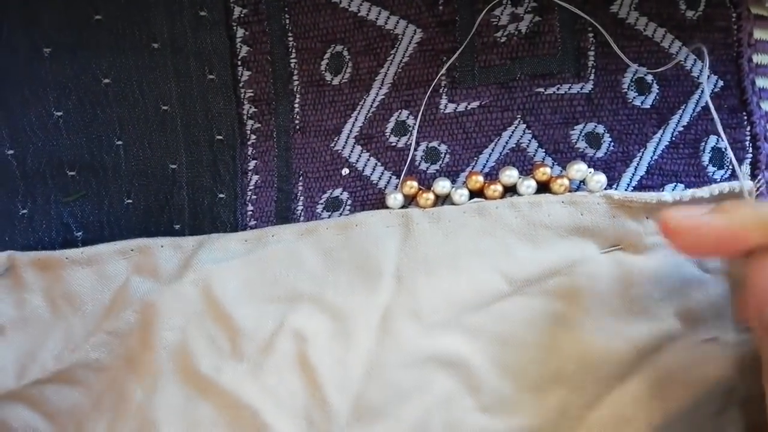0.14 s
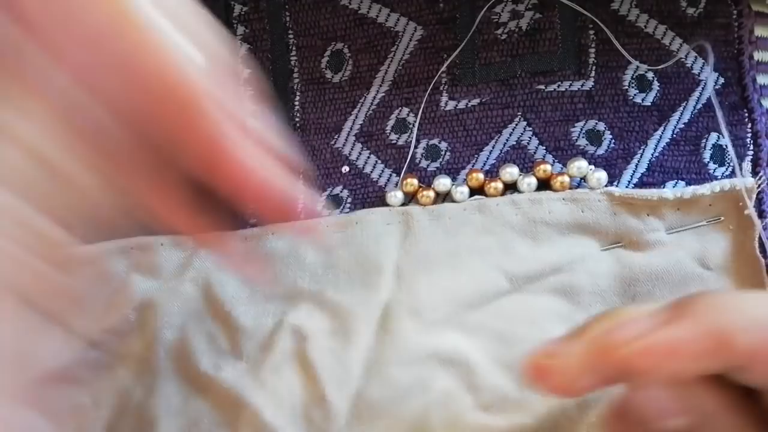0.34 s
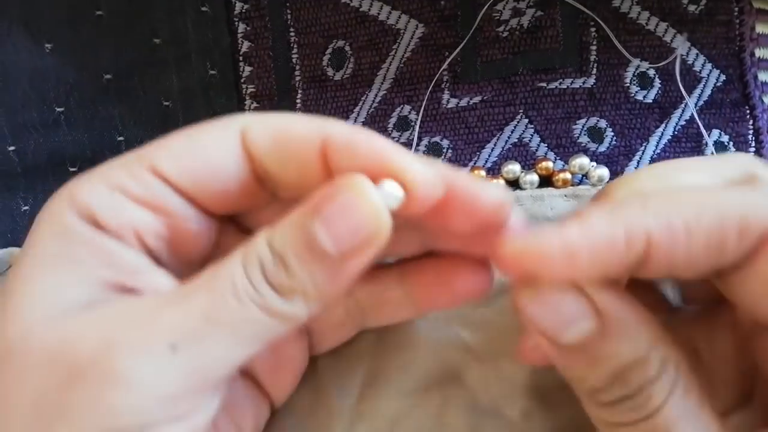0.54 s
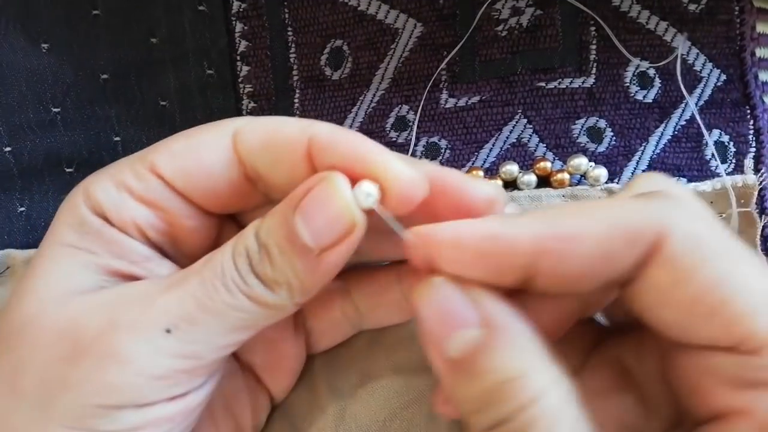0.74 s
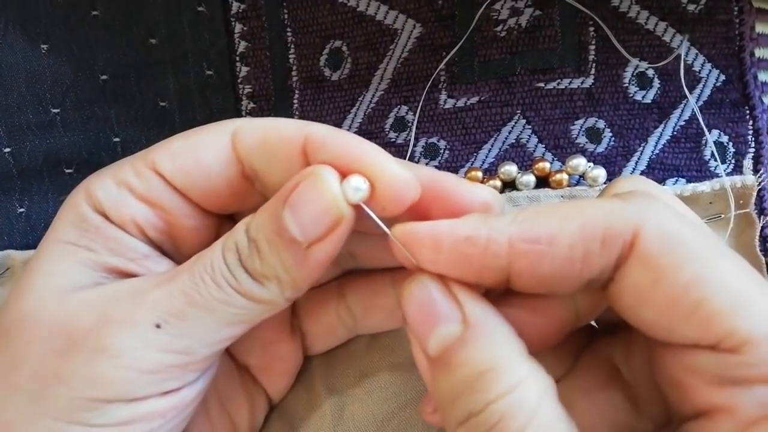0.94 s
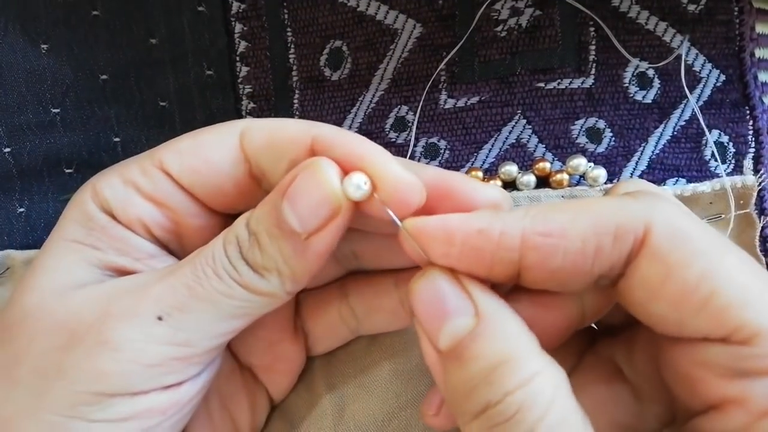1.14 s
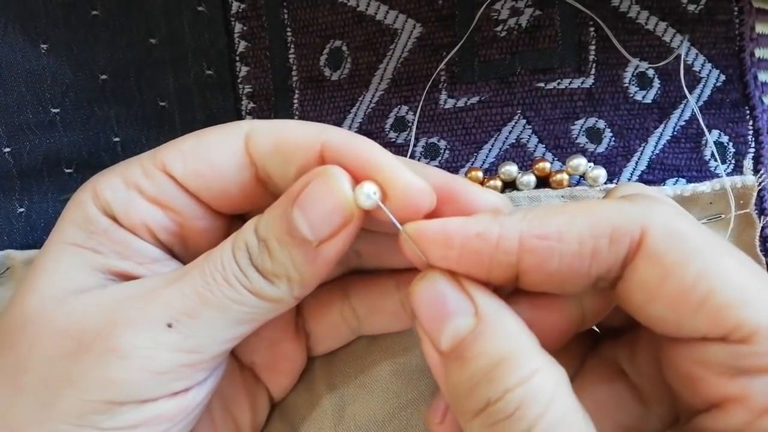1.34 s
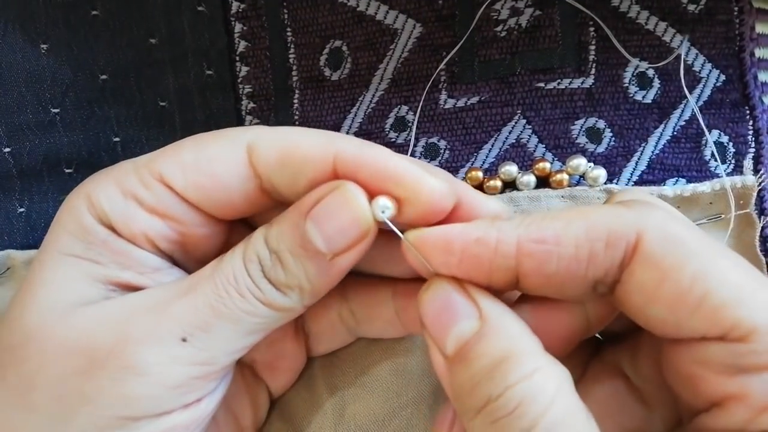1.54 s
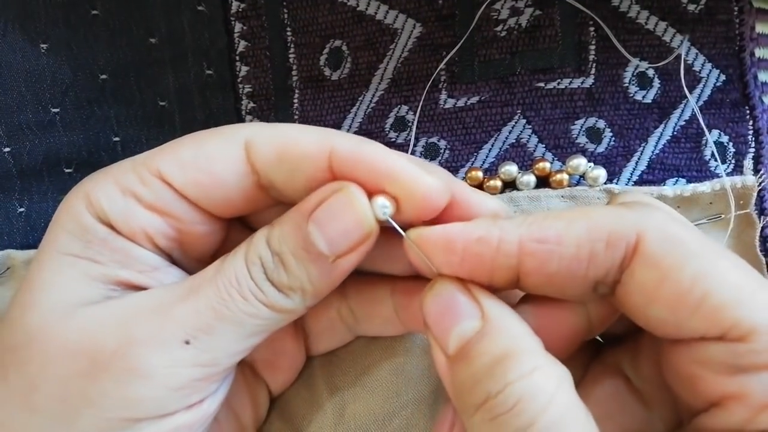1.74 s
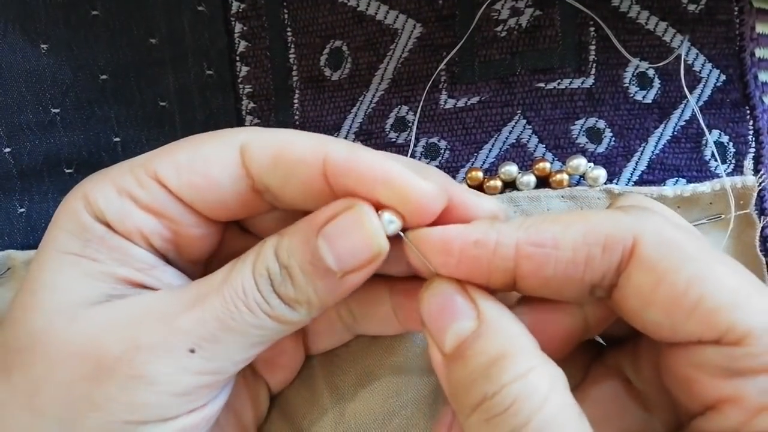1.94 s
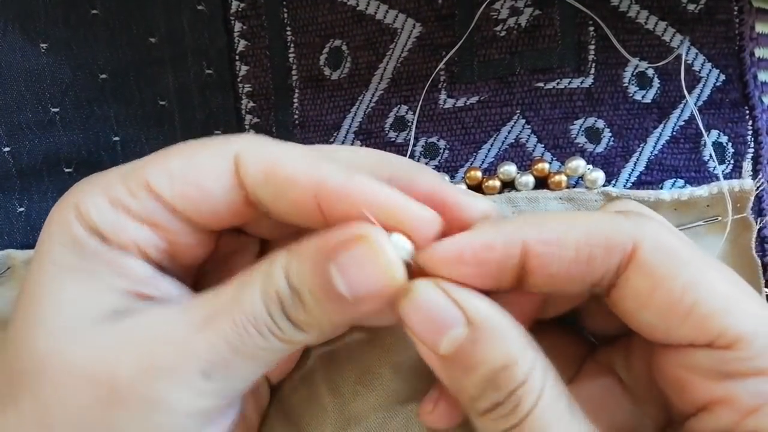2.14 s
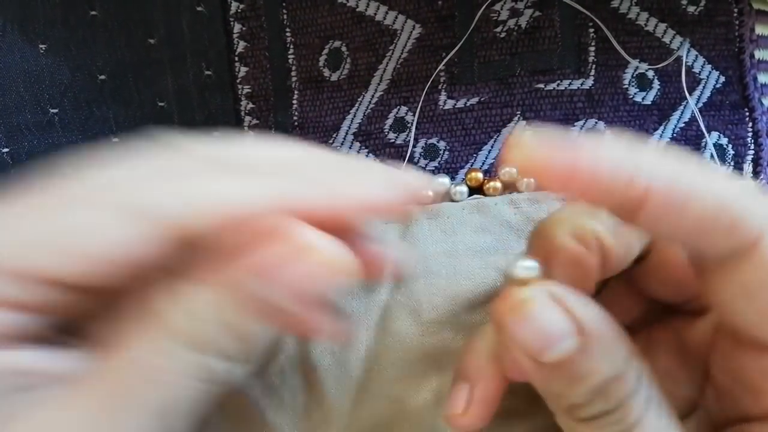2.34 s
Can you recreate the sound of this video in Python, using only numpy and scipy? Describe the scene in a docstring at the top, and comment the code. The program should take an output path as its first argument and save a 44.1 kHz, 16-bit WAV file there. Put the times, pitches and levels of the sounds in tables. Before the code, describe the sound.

A small bead hits a hard little dish, left of centre, at about 0.07 s, chattering in rapid, very bright, short clicks until 0.16 s. Weaker ticks come around 0.23-0.29 s and a faint nudge and roll at 0.39-0.45 s. Light cloth brushing and soft low table bumps surround it. Then quiet hiss and rumble, a barely audible tick near 1.87 s, and a soft sleeve stroke peaking around 2.29 s.

```python
"""In a quiet room, a bead drops into a small hard dish on the left, bounces rapidly and is nudged again.
Each contact is a filtered noise tap plus decaying dish modes; rolling is a shower of tiny contacts.
Shaped, grainy noise makes the cloth, and one long sleeve stroke comes near the end.
Stereo noise makes the hiss and the low rumble; bumps of the table are short low swings.
Two ports hear the scene: the right one hears the dish slightly later, and the room echoes it."""
import sys
import numpy as np
from scipy import signal
from scipy.fft import rfft, irfft, next_fast_len
from scipy.io import wavfile
from scipy.ndimage import map_coordinates

SR = 44100
rng = np.random.default_rng(int(sys.argv[2]) if len(sys.argv) > 2 else 0)


def waveform_to_disk(signal):
    """Save audio, clipped to [-1, 1], as 16-bit WAV at the path in sys.argv[1]."""
    frames = np.transpose(np.atleast_2d(signal))
    scaled = np.clip(frames, -1, 1) * 32767
    samples = np.round(scaled).astype(np.int16)
    wavfile.write(sys.argv[1], SR, samples)


def nominal_scale(level):
    """Amplitude ratio for a level in decibels (scalar or array-like)."""
    x = np.asarray(level, float) / 20
    return 10 ** x


N = 106104  # samples

# Light brushing of cloth. Each row: time in seconds, level in dB.
BRUSH_LEVEL = [(0, -65.5), (.15, -88), (.24, -79), (.33, -62.5), (.4, -69.5), (.5, -69), (.58, -62),
               (.68, -71.5), (.8, -72.5), (.9, -78), (1.3, -85.5), (1.45, -72), (1.56, -69.5),
               (1.65, -79.5), (1.95, -77.5), (2.01, -79), (2.08, -77.5), (2.2, -67), (2.4, -76)]
# Spectrum of the brushed fibres. Each row: frequency in Hz, density in dB per Hz.
FIBRE_SPECTRUM = [(2500, -15), (3700, -6), (5000, -24.5), (8000, -7), (10300, -1), (12000, -7),
                  (14000, -19), (16000, -37)]
# Spectrum of the long sleeve stroke. Each row: frequency in Hz, density in dB per Hz.
SLEEVE_SPECTRUM = [(150, -25), (300, -12), (2300, -9), (3700, -8), (4600, -15.5), (8200, -8), (10300, 0.5),
                   (12000, -7.5), (14200, -20), (16000, -51)]
# Side balance of all cloth. Each row: frequency in Hz, left over right in dB.
CLOTH_BALANCE = [(600, 14), (2300, 3), (3700, 7), (5000, 16.5), (7200, 6), (8700, 7.5), (10300, 9),
                 (12000, 0.5)]
# Spectrum of the room hiss. Each row: frequency in Hz, density in dB per Hz.
HISS_SPECTRUM = [(35, -30), (60, -1.5), (139, -6), (172, -6), (261, -5.5), (354, -5.5), (388, -10.5),
                 (664, -18), (764, -12.5), (879, -12.5), (1470, -11.5), (3410, -17.5), (5560, -14),
                 (15900, -28.5)]
# Stereo width of the hiss. Each row: frequency in Hz, side over mid in dB.
HISS_WIDTH = [(60, -13), (120, -2), (240, -7.5), (480, 7), (950, 0), (1890, -1), (3770, 1), (7520, 0),
              (15000, 1.5)]
# Spectrum of the low rumble. Each row: frequency in Hz, density in dB per Hz.
RUMBLE_SPECTRUM = [(8.8, -40), (15, -25), (21, 7), (65, 3.5), (107, -3), (140, -10.5), (220, -11),
                   (290, -21), (480, -120)]
# Low rumble through the stand. Each row: time in seconds, level in dB.
RUMBLE_LEVEL = [(0.0, -71.5), (0.1, -66), (0.19, -94), (0.23, -68), (0.3, -80), (.44, -72), (0.51, -59),
                (0.54, -74.5), (1.1, -66.5), (1.18, -78), (1.35, -63), (1.61, -65.5), (1.7, -73.5),
                (1.77, -64), (1.83, -74.5), (2.05, -78), (2.07, -72), (2.15, -81), (2.4, -71)]
# Dry ticks of bead on bead. Each row: start in seconds, peak on the left in dB.
TICKS = [(.0535, -41), (.2327, -40), (0.2894, -33), (0.4407, -40), (1.8717, -46.5), (2.034, -67)]
# The bead strikes the dish. Each row: start in seconds, left peak of the tap in dB,
# then the blow to the bottom, to the rim and to the wall, each in dB.
CONTACTS = [(0.0643, -35, -39, -40, -59), (0.0738, -12.5, -18.5, -25.5, -34),
            (.0840, -28.5, -32, -28, -37.5), (0.1, -12.5, -18, -24, -33), (0.1098, -34.5, -42, -30, -42.5),
            (0.1205, -18.5, -20.5, -28, -39.5), (0.131, -34.5, -40, -30, -45),
            (0.1363, -21.5, -21.5, -29.5, -45), (.1440, -40.5, -45, -37, -50.5),
            (0.1491, -18, -31.5, -33, -49), (0.1599, -19, -34, -29.5, -42),
            (.2390, -36.5, -33.5, -39.5, -59), (0.3884, -48.5, -39.5, -58, -44.5),
            (0.4033, -30, -44, -48, -55), (.414, -36, -41.5, -42, -59.5), (0.4509, -43, -47.5, -40, -51.5)]
# Resonances that colour the tap. Each row: frequency in Hz, width in Hz, level in dB.
TAP_RESONANCES = [(10030, 1900, 6), (14600, 910, -1.5), (6000, 3200, -20.5)]
# Modes of the dish's bottom, rim and wall.
# Each row: frequency in Hz, level in dB, 60 dB decay in seconds, left over right in dB.
BOTTOM_MODES = [(2460, -32, 0.058, 7), (3705, -27, 0.018, -4.5), (5590, -32.5, 0.0201, -1),
                (8800, -21, 0.016, 0), (9030, 0, 0.023, 7.5), (9110, -17, 0.039, 4),
                (9263, -0.5, 0.024, 11.5), (9830, -11.5, .012, 7), (14330, -8.5, 0.026, 2),
                (14860, -24.5, 0.0151, -0.5)]
RIM_MODES = [(4358, -23.5, .06, 12), (10980, -6, 0.036, 10), (10990, -4, 0.067, 10),
             (13280, -6.5, 0.032, 1), (14380, -18.5, .02, 3)]
WALL_MODES = [(5660, -5, 0.021, 2), (6605, -7.5, 0.048, 5.5), (7470, -11, 0.017, 4), (12250, 1, .04, 8),
              (12500, -4, .04, 14.5)]
# The bead rolls and chatters. Each row: start in seconds, end in seconds, level in dB.
ROLLS = [(0.064, 0.163, -52), (0.386, 0.431, -62.5)]
# Early echoes. Each row: delay in seconds, level in dB.
ECHOES = [(.0026, -14), (0.0087, -36), (.0135, -44), (0.022, -25)]
# Decay of the room's tail. Each row: frequency in Hz, 60 dB decay in seconds.
ROOM_DECAY = [(2000, 0.26), (9000, 0.31), (15000, 0.17)]
# A hand bumps the table. Each row: reference time in seconds, half a cycle before the envelope's peak, envelope
# peak in dB, pitch in Hz.
BUMPS = [(.446, -53.5, 201), (0.489, -64, 150), (.499, -53, 194), (.51, -62, 120), (1.361, -56.5, 90),
         (1.437, -56.5, 109), (2.069, -59, 75.3)]

STRIKE_RISE_S = 0.00022  # time constant with which taps and modes build up
TICK_T60_S = 0.0018


def along(points, hz):
    """Spectra are interpolated on a logarithmic frequency axis."""
    f, v = np.transpose(points)
    return np.interp(np.log(hz + 1), np.log(f + 1), v)


def curve(rows):
    """A slow level is linear between its knots, one value per sample."""
    return np.interp(np.arange(N) / SR, *np.transpose(rows))


def wobble(rate):
    """A smooth random fluctuation is a spline through random knots, rate of them a second."""
    knots = rng.standard_normal(int(N * rate / SR) + 4)
    return map_coordinates(knots, [np.arange(N) * rate / SR])


def filtered(x, response):
    """A linear system multiplies the spectrum by its complex response."""
    m = next_fast_len(x.shape[-1] + 8192)
    spectrum = rfft(x, m) * response(np.fft.rfftfreq(m, 1 / SR))
    return irfft(spectrum, m)[..., :x.shape[-1]]


def rubbing(spectrum, grain_db):
    """Friction is noise of fluctuating grain, coloured by the cloth and balanced between the sides."""
    grains = rng.standard_normal((2, N)) * nominal_scale(grain_db * wobble(300))

    def colour(hz):
        side_db = np.outer([.5, -.5], along(CLOTH_BALANCE, hz))
        return nominal_scale(along(spectrum, hz) + side_db)

    noise = filtered(grains, colour)
    return noise / np.std(noise.mean(axis=0))


def cloth_brushing():
    """Light friction of cloth is noise under a slow level curve with a random fluctuation."""
    level_db = curve(BRUSH_LEVEL) + 2.9 * wobble(17.92)
    return nominal_scale(level_db) * rubbing(FIBRE_SPECTRUM, grain_db=2.0)


def diffuse(spectrum, width):
    """A diffuse field is a mid noise plus an unrelated side noise, opposite at the two ports."""
    def colour(hz):
        return nominal_scale(along(spectrum, hz) + np.array([0 * hz, along(width, hz)]))

    mid, side = filtered(rng.standard_normal((2, N)), colour)
    return np.array([mid + side, mid - side]) / np.std(mid)


def room_hiss():
    """Broadband noise of nearly constant power forms the hiss; its level wavers slightly."""
    return nominal_scale(-67.5 + .4 * wobble(6)) * diffuse(HISS_SPECTRUM, HISS_WIDTH)


def low_rumble():
    """Low-frequency noise swells and sinks as handling excites the stand."""
    level_db = curve(RUMBLE_LEVEL) + 1.7 * wobble(24.93)
    return nominal_scale(level_db) * diffuse(RUMBLE_SPECTRUM, [(30, -17.0), (200, -9.5)])  # width: (Hz, dB)


def tap(t, t60):
    """An impact excites broad resonances with a brief noise burst, partly shared by both sides."""
    low_hz, left_over_right_db = 4000, 10

    def colour(f):
        low_cut = (1j * f / (1j * f + low_hz)) ** 2
        total = 0
        for k, (centre, width, db) in enumerate(TAP_RESONANCES):
            band = 1j * f * width / (centre * centre - f * f + 1j * f * width)
            total = total + (-1) ** k * nominal_scale(db) * band  # neighbours take opposite signs
        return low_cut * total

    noise = rng.standard_normal(len(t)) + 0.79 * rng.standard_normal((2, len(t)))
    envelope = (1 - np.exp(-t / STRIKE_RISE_S)) * nominal_scale(-60 * t / t60)
    burst = filtered(noise * envelope, colour)
    peak_one = burst / np.abs(burst).max(axis=1, keepdims=True)
    return peak_one * nominal_scale([[0], [-left_over_right_db]])


def add_at(out, start_s, sound):
    """Sounds superpose: this one is added from its start."""
    out[:, round(start_s * SR):][:, :sound.shape[-1]] += sound


def ticks(out, t):
    """A dry tick is an impact without modal ringing."""
    for s, db in TICKS:
        add_at(out, s, nominal_scale(db) * tap(t, TICK_T60_S))


def ring(modes, t, blow_db=0):
    """Struck modes decay exponentially; softer blows excite the treble less."""
    scatter_db, phase_scatter_cycles = 1.5, 0.08
    dulling, hard_db, dull_from_hz = 0.49, -20, 11500  # dulling: dB per octave per dB below hard
    hz, db, t60, left_db = np.transpose(modes)[..., None]
    strength, phase = rng.standard_normal((2,) + hz.shape)
    octaves = np.maximum(np.log2(hz / dull_from_hz), 0)
    db = db + blow_db + dulling * min(blow_db - hard_db, 0) * octaves
    db = db + scatter_db * strength - 60 * t / t60
    swing = np.sin(2 * np.pi * (hz * t + phase_scatter_cycles * phase))
    left = np.sum(nominal_scale(db) * swing, axis=0)
    right = np.sum(nominal_scale(db - left_db) * swing, axis=0)
    return np.array([left, right]) * (1 - np.exp(-t / STRIKE_RISE_S))


def contacts(out, t):
    """An impact sums a tap and the ringing dish; the next contact damps that ringing."""
    damping_db = -5
    following = [row[0] for row in CONTACTS[1:]] + [np.inf]
    for (s, tap_db, *blows_db), next_s in zip(CONTACTS, following):
        parts = zip(blows_db, (BOTTOM_MODES, RIM_MODES, WALL_MODES))
        rings = sum(ring(modes, t, db) for db, modes in parts)
        muted = rings * nominal_scale(damping_db * (t > next_s - s))
        add_at(out, s, nominal_scale(tap_db) * tap(t, 0.0035) + muted)


def chatter(t):
    """Rolling is a random train of tiny impacts, each convolved with the dish's response."""
    contacts_per_s = 1100
    now = np.arange(N) / SR
    level = sum(nominal_scale(db) * ((now > start) & (now < end)) for start, end, db in ROLLS)
    pulses = level * (rng.random(N) < contacts_per_s / SR) * rng.standard_normal(N)
    answer = nominal_scale(15.0) * tap(t, TICK_T60_S) + ring(BOTTOM_MODES, t) + ring(RIM_MODES, t)
    answer = answer + nominal_scale(-11.5) * ring(WALL_MODES, t)
    return signal.fftconvolve(pulses[None], answer, axes=1)[:, :N]


def table_knock(out, t):
    """An early landing also knocks the table, a heavily damped oscillation."""
    s, db, hz, t60 = .0735, -40, 2200, .002  # start in seconds, dB, Hz, seconds
    add_at(out, s, nominal_scale(db - 60 * t / t60) * np.sin(2 * np.pi * hz * t))


def dish():
    """All dish sounds superpose; the longer path delays them at the right port."""
    right_late_s = 0.000208
    out, t = np.zeros((2, N + SR)), np.arange(SR // 5) / SR
    ticks(out, t)
    contacts(out, t)
    table_knock(out, t)
    return filtered(out[:, :N] + chatter(t),
                    lambda hz: np.exp(-2j * np.pi * np.outer([0, right_late_s], hz)))


def room(x):
    """Discrete reflections precede a reverberant tail whose decay depends on frequency."""
    tail_db = -12
    early = filtered(x, lambda hz: sum(nominal_scale(db) * np.exp(-2j * np.pi * hz * s) for s, db in ECHOES))
    hz, t, z = signal.stft(rng.standard_normal((2, SR // 2)), SR, nperseg=256)
    decay = nominal_scale(-60 * t / along(ROOM_DECAY, hz)[:, None])
    tail = signal.istft(z * decay, SR, nperseg=256)[1]
    tail = tail / np.linalg.norm(tail[0])
    return early + nominal_scale(tail_db) * signal.fftconvolve(x, tail, axes=1)[:, :N]


def table_bumps():
    """A bump is a low oscillation under a Gaussian envelope, alike on both sides."""
    width_cycles = 0.95  # between the envelope's 1/e points
    now = np.arange(N) / SR
    total = np.zeros(N)
    for s, db, hz in BUMPS:
        cycles = (now - s) * hz
        envelope = np.exp(-(2 * (cycles - .5) / width_cycles) ** 2)
        total += nominal_scale(db) * envelope * np.sin(2 * np.pi * cycles)
    return total


def sleeve_stroke():
    peak_s, rise_s, fall_s, level_db = 2.288, 0.053, 0.059, -55.5
    u = np.arange(N) / SR - peak_s
    stroke = np.exp(-.5 * (u / np.where(u < 0, rise_s, fall_s)) ** 2)
    return nominal_scale(level_db + 1.1 * wobble(40)) * stroke * rubbing(SLEEVE_SPECTRUM, grain_db=1.0)


def scene():
    """Sound pressures add; only the dish is given echoes and a tail."""
    background = cloth_brushing() + room_hiss() + low_rumble()
    direct = dish()
    return background + direct + room(direct) + table_bumps() + sleeve_stroke()


def low_pass(x):
    """Removes everything above the highest recorded frequency."""
    return signal.sosfilt(signal.butter(12, 16320, fs=SR, output="sos"), x)


def record(dry):
    """A low-pass response removes everything from 15.9 kHz upward."""
    mix = filtered(dry, lambda hz: hz < 15900)
    return low_pass(mix)


dry = scene()
out = record(dry)
waveform_to_disk(out)
```